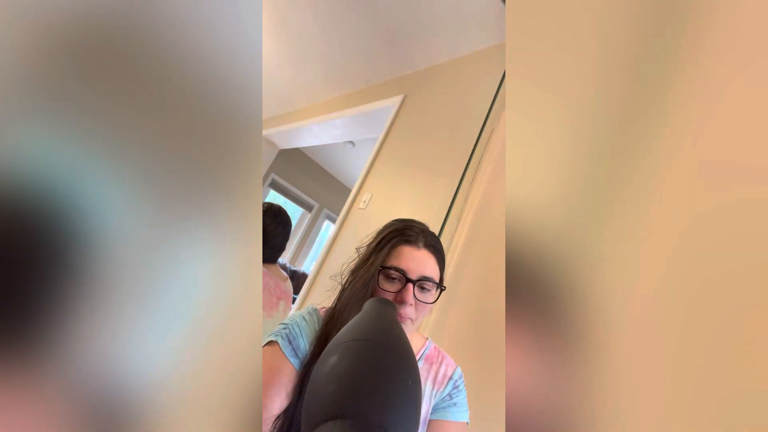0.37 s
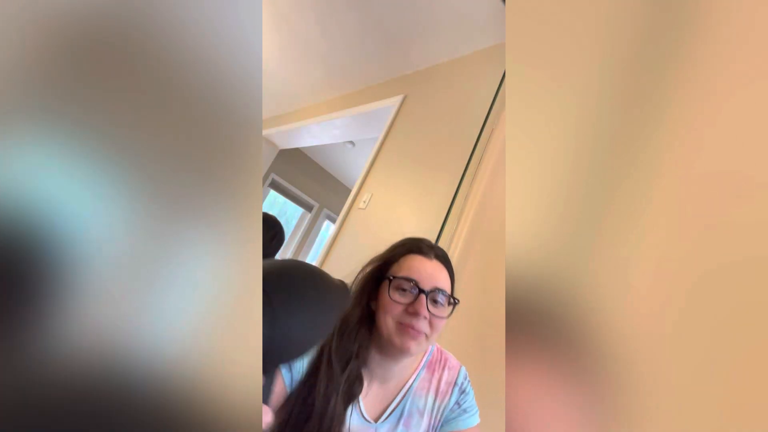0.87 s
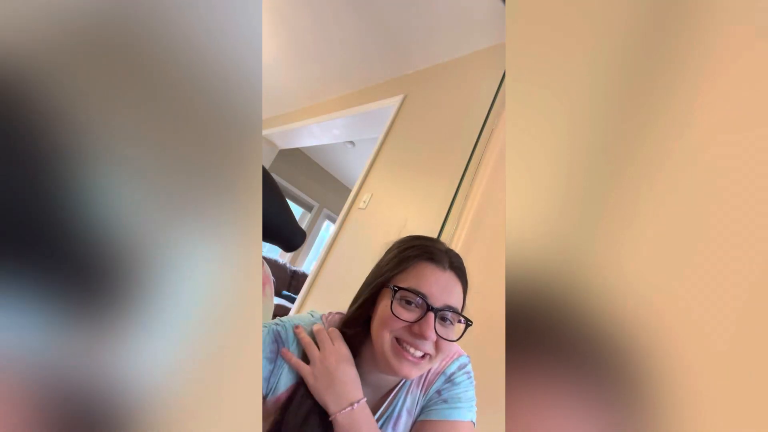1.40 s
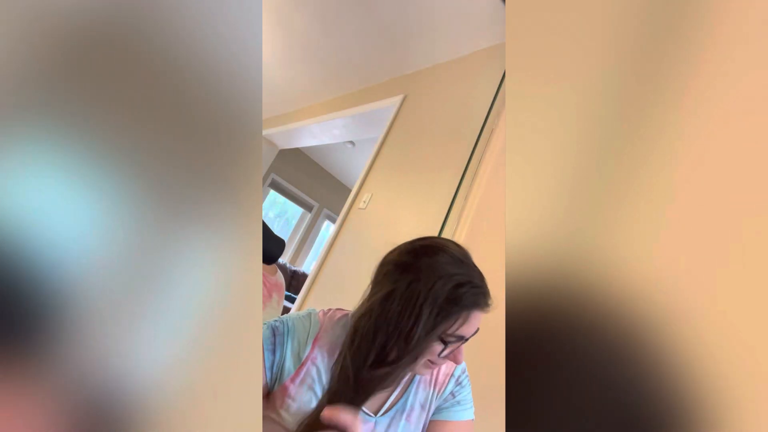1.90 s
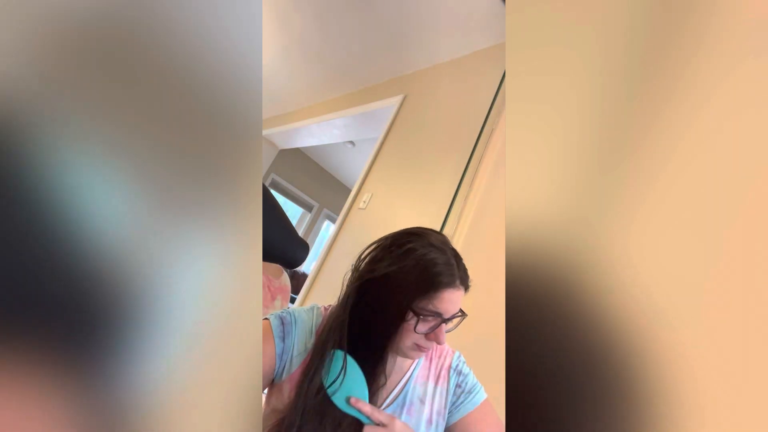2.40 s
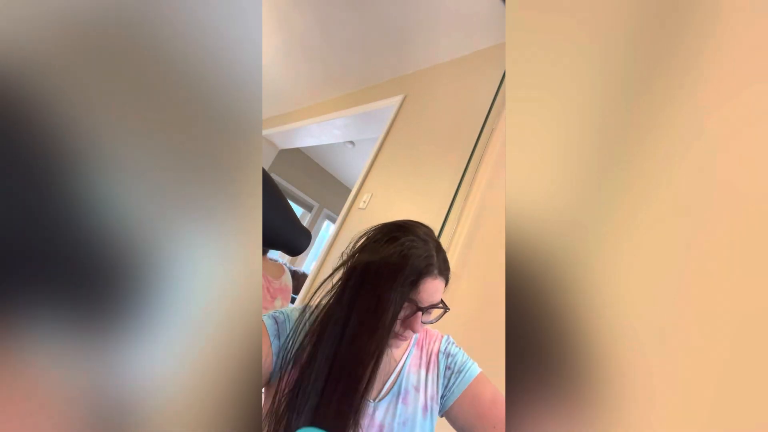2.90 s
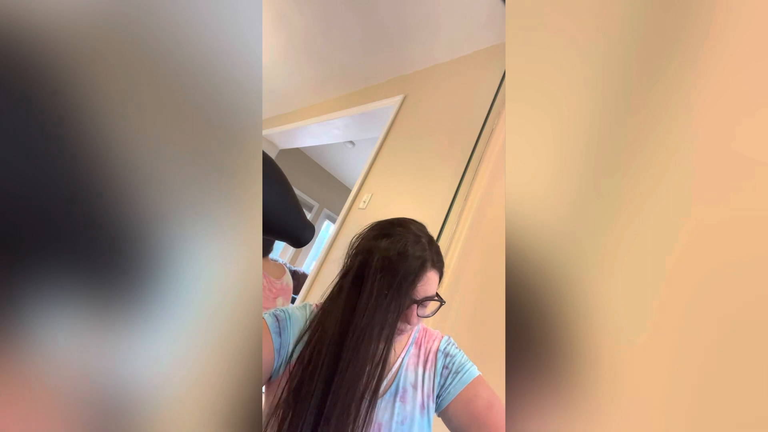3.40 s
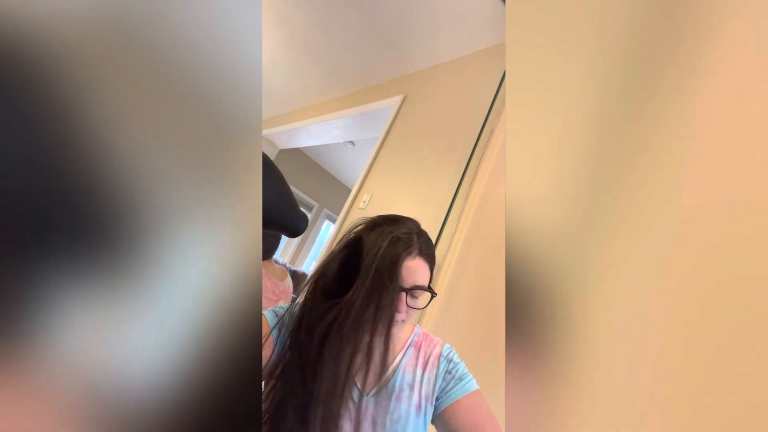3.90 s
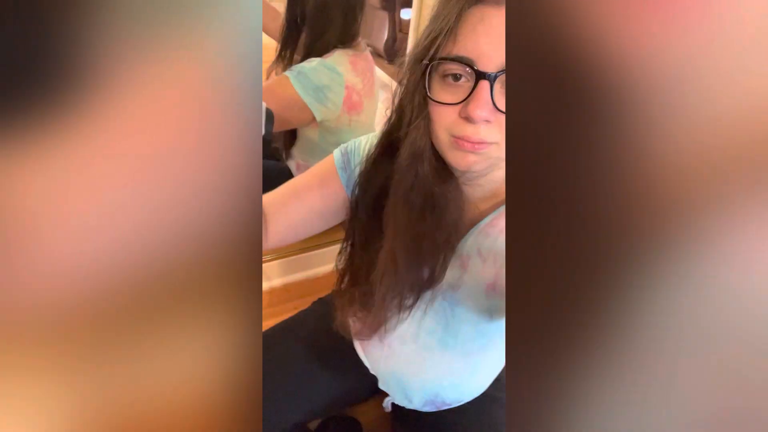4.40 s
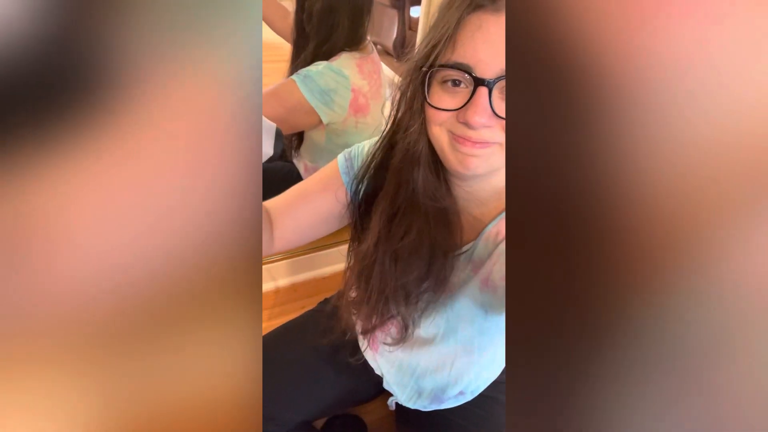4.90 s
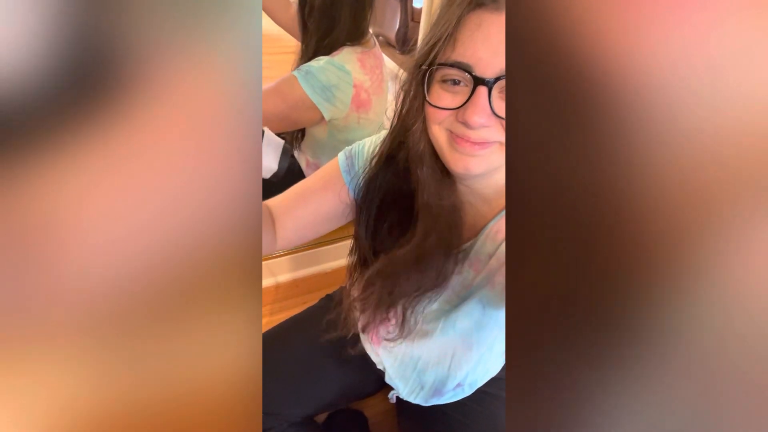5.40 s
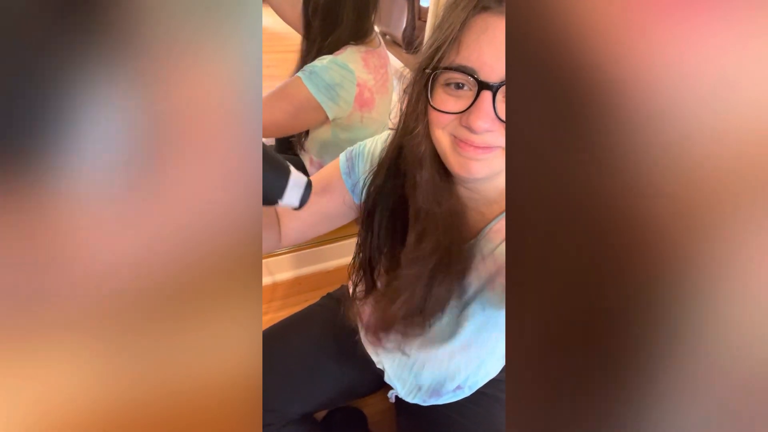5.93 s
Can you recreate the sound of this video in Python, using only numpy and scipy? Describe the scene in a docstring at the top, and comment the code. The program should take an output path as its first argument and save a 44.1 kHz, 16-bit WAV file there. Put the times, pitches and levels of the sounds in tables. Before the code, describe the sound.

Switch clicks in a quiet room, then a hair dryer's rush swells to a loud, hissy roar and keeps blowing, its tone shifting at two cuts.

```python
"""Hair dryer in a small room

A handheld hair dryer is switched on close to a phone's two microphone ports, spins up and blows steadily.
Shaped noise, its level set by fan speed, rings the barrel's resonances over a faint shaft sine; switch
detents rattle a ringing housing, brushes whirr thinly and the quiet room lies beneath. Three shots are
joined by hard cuts, the later two fading in quickly, with the dryer held a little differently in each."""
import sys
import numpy as np
from scipy import signal
from scipy.fft import rfft, irfft
from scipy.io import wavfile
from scipy.ndimage import uniform_filter1d

SR = 44100
rng = np.random.default_rng(int(sys.argv[2]) if len(sys.argv) > 2 else 0)


def level_to_linear(level):
    """Convert decibel levels to linear amplitude factors, elementwise."""
    exponent = np.asarray(level, float) / 20
    return 10 ** exponent


def waveform_to_disk(signal):
    """Save audio, clipped to [-1, 1], as 16-bit WAV at the path in sys.argv[1]."""
    frames = np.transpose(np.atleast_2d(signal))
    scaled = np.clip(frames, -1, 1) * 32767
    samples = np.round(scaled).astype(np.int16)
    wavfile.write(sys.argv[1], SR, samples)


N = 266584
SIZE, HOP = 2048, 512  # short-time frames (samples)
FRAME_S = np.arange(N // HOP + 6) * HOP / SR
BIN_HZ = np.fft.rfftfreq(SIZE, 1 / SR)
BIN_COLUMN_HZ = BIN_HZ[:, None]


def evened(x):
    """Scales to rms 1."""
    return x / np.sqrt(np.mean(x ** 2) + 1e-20)


def read(hz_points, values, hz):
    """Joins points on a log frequency axis."""
    return np.interp(np.log(hz + 1), np.log(np.asarray(hz_points) + 1), values)


def noise(magnitude):
    """Two unrelated noises with one short-time magnitude (bins x frames): direct path and room path."""
    real, imaginary = rng.standard_normal((len(FRAME_S), len(BIN_HZ), 2, 2)).T
    return signal.istft((real + 1j * imaginary) * magnitude, nperseg=SIZE, noverlap=SIZE - HOP)[1][:, :N]


def resonance(hz, width_hz, db, steepness):
    """Power of one resonance over bins and frames, falling away on both sides of its peak."""
    return level_to_linear(db) ** 2 / (1 + (2 * (BIN_COLUMN_HZ - hz) / width_hz) ** 2) ** steepness


# where one shot is cut to the next: cut_s
CUT_TIMES = [1.9772, 4.2938]


def by_shot(table, t):
    """The columns of a one-row-a-shot table at times t."""
    return np.array(table)[np.searchsorted(CUT_TIMES, t)].T


def speed(t):
    """Share of full shaft speed: an exponential approach once the second detent powers the motor."""
    spin_up_s = 0.42
    return 0.00083 + 1 - np.exp(-np.maximum(t - DETENTS[1][0], 0) / spin_up_s)


# broad turbulence under the resonances, relative levels: pitch_hz, level_db (per Hz)
TURBULENCE = [(30, -48), (85, -18), (170, -23.5), (330, -14.5), (620, -13.5), (900, -12), (1600, -16.5),
              (2250, -13.5), (2450, -16), (2700, -10), (4500, -15), (4950, -17), (5500, -12), (7500, -10.5),
              (10000, -17), (11500, -21), (13500, -25.5), (15000, -24), (16000, -29)]
# roar, rush and hiss, the bands whose power is levelled: low_hz, high_hz
AIR_BANDS = [(150, 2400), (2500, 4200), (4200, 11000)]
# one row a shot, relative, at full speed: roar_db, rush_db (above the roar), hiss_db (above the roar), hum_db
SHOT_LEVELS = [(-26, -5, -1.1, -51.5), (-26, -5.5, -0.44, -48.5), (-26, -5, -2.1, -44.5)]
# how the dryer is held: time_s, nearness (0 at the hair, 1 beside the phone), aim (0 side-on, 1 at the phone)
HAND = [(.44, 0.88, .05), (.58, 1.26, 0.63), (.68, 1.14, 1.05), (.78, 1.06, 0.95), (1.05, 0.73, 0.71),
        (1.3, 0.26, 0.13), (1.7, 0.06, 0.026), (3.82, 0.015, 0.012), (4.0, .02, 0.42), (4.28, .05, 0.68),
        (4.3, 0.036, .02), (5.15, 0.022, 0.088), (5.4, 0.0089, 0.15), (6.04, 0.3, 0.1)]
ROAR_LAW, RUSH_LAW, HISS_LAW = 3.1, 3.5, 4.5  # amplitude grows as speed to this power


def air():
    """Turbulence through the barrel: noise whose roar, rush and hiss follow fan speed and aim."""
    s, nearness, facing = np.transpose(HAND)
    near, aim = (np.clip(np.interp(FRAME_S, s, column), 0, 1.2) for column in (nearness, facing))
    power = level_to_linear(read(*np.transpose(TURBULENCE), BIN_HZ))[:, None] ** 2
    power = power + barrel_rings(near, aim) + hair_gap()
    # close to the phone the housing shades the top treble, and the room's bass does not grow
    power *= level_to_linear(2 * -1 * near / (1 + (7800 / (BIN_COLUMN_HZ + 1)) ** 8))
    power *= level_to_linear(2 * -6.5 * near / (1 + (BIN_COLUMN_HZ / 390) ** 8))
    power *= 1 / (1 + (48 / (BIN_COLUMN_HZ + 1)) ** 8)  # the microphone drops the deepest bass

    # level the three bands against each other, with crossovers 400 Hz wide
    roar, rush, hiss = (power[(BIN_HZ > low) & (BIN_HZ < high)].sum(0) for low, high in AIR_BANDS)
    _, rush_db, hiss_db, _ = by_shot(SHOT_LEVELS, FRAME_S)
    rush_lift = level_to_linear(rush_db) * speed(FRAME_S) ** (RUSH_LAW - ROAR_LAW)
    aimed_hiss_db = 7  # extra hiss with the nozzle at the phone
    hiss_lift = level_to_linear(hiss_db + aimed_hiss_db * aim) * speed(FRAME_S) ** (HISS_LAW - ROAR_LAW)
    above_roar = np.clip((BIN_COLUMN_HZ - 2300) / 400, 0, 1)
    above_rush = np.clip((BIN_COLUMN_HZ - 4000) / 400, 0, 1)
    gain = (rush_lift / np.sqrt(rush)) ** (above_roar - above_rush)
    gain *= (hiss_lift / np.sqrt(hiss)) ** above_rush
    gain /= np.sqrt(roar) ** (1 - above_roar)

    # the highest hiss is the most directional: it swells further when the nozzle turns to the phone
    highest = np.clip((BIN_COLUMN_HZ - 10500) / 1500, 0, 1)
    gain *= np.maximum(hiss_lift, .7) ** (1.3 * highest)
    # near but side-on, a band around 3640 Hz is shaded
    side_on = near * np.maximum(1 - aim, 0)
    gain *= level_to_linear(-8.5 * side_on / (1 + ((BIN_COLUMN_HZ - 3640) / 610) ** 4))

    blow = noise(np.sqrt(power) * gain * level_to_linear(eddies_db())) * level_to_linear(2.0)
    t = np.arange(N) / SR
    near_db = 5  # level added per unit of nearness
    level = level_to_linear(by_shot(SHOT_LEVELS, t)[0] + near_db * np.interp(t, s, nearness)) * speed(t) ** ROAR_LAW
    return blow * level, level / level.max()


# resonances of barrel and grille, warm, relative levels by pose:
# pitch_hz, width_hz, side_on_db, last_shot_side_on_db, aimed_db, beside_phone_db
BARREL = [(433, 104, -3, -7.5, -9, 1), (510, 76, -6, -.5, -10, 0.5), (1060, 26, -8, -9.5, -9, -6),
          (1313, 36.5, -9, 2, -23.5, -8), (1306, 78, -1, -3, -4, -1), (1900, 193, -24, -11.5, -22, -9.5),
          (2035, 60, -3.5, -4, -1, -2.5), (2860, 39, -20, -1, -24, -20), (3026, 30, -0.5, -4, -6, -6),
          (3220, 41, -17, 1, -29, -22), (3440, 120, -12.5, -15, -10, -27), (4000, 120, -22, -6, 0, -22),
          (4510, 187, -11, -11, -15, -2.5), (5380, 170, -12, -16, -26, -3.5),
          (5720, 44, -6.5, -8, -10, -10), (6542, 244, -5, -9, -7, 0), (7200, 55, -9, -15, 3, -7),
          (8300, 200, -10, -11, -9, -13), (8880, 79, -5, -11.5, 2.5, -6.5)]


def barrel_rings(near, aim):
    """Power of the barrel's resonances: flat while its air is cold, blended by pose, wandering with the hand."""
    cold_flat, warm_s = 0.037, 0.55  # share of pitch at the start, time constant of the heater's warming
    drift_db, drift_share = 1.6, .006  # rms swell in level, rms wander in pitch
    tuning = 1 - cold_flat * np.exp(-FRAME_S / warm_s)
    drift = rng.standard_normal((len(BARREL), 2, len(FRAME_S)))
    drift = evened(uniform_filter1d(uniform_filter1d(drift, size=24), size=24))
    power = 0
    for (hz, width_hz, side_db, last_db, aimed_db, near_db), (swell, wander) in zip(BARREL, drift):
        db = np.where(FRAME_S > CUT_TIMES[1], last_db, side_db)
        db = db + aim * (aimed_db - db)
        db += near * (near_db - db) + drift_db * swell
        moved_hz = hz * tuning * (1 + drift_share * wander)
        blurred_hz = width_hz * (1 + 0.4 * near)  # wider beside the phone
        power = power + resonance(moved_hz, blurred_hz, db, 1.27)
    return power


# resonance between dryer and hair, one row a shot, relative level: from_hz, to_hz, width_hz, level_db
GAP_SLIDES = [(694, 820, 120, -7.5), (690, 750, 63, -5.5), (750, 750, 54, -65)]


def hair_gap():
    """Power of the resonance between dryer and hair, sliding in pitch as the gap changes."""
    shots = np.c_[[0, *CUT_TIMES], [*CUT_TIMES, N / SR], GAP_SLIDES]
    start, end, from_hz, to_hz, width_hz, db = by_shot(shots, FRAME_S)
    hz = from_hz + (to_hz - from_hz) * (FRAME_S - start) / (end - start)
    return resonance(hz, width_hz, db, 1.54)


def eddies_db():
    """Eddies as random level: patches a few hundred Hz wide, and a flutter shared by all bands."""
    patchy_db, flutter_db = 1.13, 0.28  # rms
    draws = rng.standard_normal((len(FRAME_S), len(BIN_HZ) + 1)).T
    patches = uniform_filter1d(uniform_filter1d(draws[1:], 15, 0), 6, 1)
    flutter = uniform_filter1d(draws[0], 3)
    return patchy_db * evened(patches) + flutter_db * evened(flutter)


# low room resonances under the roar, at its loudest: pitch_hz, width_hz, level_db
LOW_ROOM = [(86.6, 23, -51.5), (222.4, 25, -49)]


def hum(effort):
    """The unbalanced shaft as a wavering sine, and narrow low resonances fed by the air."""
    full_hz, hum_law = 277.2, 2.6  # pitch at full speed; amplitude grows as speed to this power
    t = np.arange(N) / SR
    waver = evened(uniform_filter1d(uniform_filter1d(rng.standard_normal(N), 4000), 4000))
    shaft_hz = full_hz * speed(t) + 0.875 * waver
    tone = np.sqrt(2) * np.sin(2 * np.pi * np.cumsum(shaft_hz) / SR)
    out = tone * level_to_linear(by_shot(SHOT_LEVELS, t)[3]) * speed(t) ** hum_law
    bins_hz = np.fft.rfftfreq(N, 1 / SR)
    for hz, width_hz, db in LOW_ROOM:
        ring = irfft(rfft(rng.standard_normal(N)) / (1 + (2 * (bins_hz - hz) / width_hz) ** 2), N)
        out += level_to_linear(db) * evened(ring) * effort
    return out


# slider detents: start_s, peak_db (direct sound), rattle_s, crack_db (crack gain beside the ring)
DETENTS = [(.1620, -41, .006, 7.5), (.2073, -24.5, .0065, 5.5), (.2628, -24.5, .008, 6.5)]
# modes of the housing, relative levels: pitch_hz, level_db, t60_s
HOUSING = [(243, -16, 0.08), (483, -16, 0.091), (930, -20, 0.042), (1370, -1, 0.054), (2070, -2, 0.039),
           (3300, 4, 0.011), (6600, 1, 0.004)]


def switch():
    """Each detent's rattle, a short noise burst, cracks and rings the housing; the room answers."""
    rattle_rise_s, room_t60_s, room_db = .003, .2, -6.5
    t = np.arange(SR // 2) / SR
    shell = sum(level_to_linear(db - 60 * t / t60) * np.sin(2 * np.pi * hz * t) for hz, db, t60 in HOUSING)
    shell /= np.linalg.norm(shell)
    crack_filter = signal.butter(1, [1100, 15000], "band", fs=SR)  # thin, little bass
    out = np.zeros((2, N))
    for start_s, db, length_s, crack_db in DETENTS:
        envelope = np.clip(t / rattle_rise_s, 0, 1) ** 1.6 * np.exp(-2 * (t / length_s) ** 2)
        rattle = rng.standard_normal(len(t)) * envelope * (t < 4 * length_s)
        crack = level_to_linear(crack_db) * signal.lfilter(*crack_filter, rattle)
        ring = signal.fftconvolve(rattle, shell)[:len(t)]
        size = level_to_linear(db) / abs(ring + crack).max()
        tail = rng.standard_normal((2, len(t))) * level_to_linear(-60 * t / room_t60_s) * (t > .004)
        tail /= np.linalg.norm(tail[0])
        to_walls = .4 * ring + crack  # only a share of the ring reaches the walls
        wet = signal.fftconvolve(to_walls[None], tail, axes=1)[:, :len(t)]
        click = (ring + crack) * np.array([[1], [.5]]) + level_to_linear(room_db) * wet
        out[:, round(start_s * SR):][:, :len(t)] += size * click
    return out


def brushes():
    """Motor brushes as a thin broad whirr from the moment of power, soon buried under the air."""
    band = signal.butter(2, (400, 7350), "band", fs=SR)
    whirr = evened(signal.lfilter(*band, rng.standard_normal((2, N))))
    powered = np.clip((np.arange(N) / SR - DETENTS[1][0]) / .01, 0, 1)
    return level_to_linear(-55.5) * whirr * powered


# spectrum of the quiet room, relative levels: pitch_hz, level_db (per Hz)
QUIET_ROOM = [(24, -30), (40, -1), (156, -7), (248, -16), (900, -20), (1300, -20), (10000, -29),
              (13000, -67), (22000, -120)]


def room_floor():
    """The quiet room as steady, bass-heavy noise."""
    floor = noise(level_to_linear(read(*np.transpose(QUIET_ROOM), BIN_HZ))[:, None])
    return level_to_linear(-75.5) * evened(floor)


# microphone port pair, side against mid:
# pitch_hz, side_db (first two shots), last_side_db (last shot), tied_share (to mid), side_phase_rad
PORT_PAIR = [(60, -49, -33, .3, 0), (150, -28, -38, .3, 12.5), (393, -21.5, -25.5, 0.46, 0),
             (930, -8.5, -7, 0.33, -0.2), (2010, -5, -11, .4, -1.4), (2630, 0, 2.5, 0.33, 2),
             (3150, -0.5, -1, 0.55, 1), (3800, -19, -3.5, .3, 2), (4430, -5.5, -7, .3, 1.3),
             (5200, -11.5, -4.5, .3, 1.7), (6100, -24, -10, .3, 1.6), (6330, -11.5, -11.5, 0.81, 1.57),
             (8400, -0.5, -1, .8, 1.57), (10160, 0.5, 1, .8, 1.57), (11400, 19, 21, .8, 1.57),
             (12100, 27, 17, .8, 3), (12600, 45, 45, .8, 8)]


def ports(direct, diffuse):
    """Two close ports: the side signal is a phase-turned share of the mid plus unrelated room sound."""
    hz, first_db, last_db, tied, phase = np.transpose(PORT_PAIR)
    _, t, (direct_bins, room_bins) = signal.stft([direct, diffuse], SR, nperseg=SIZE, noverlap=SIZE - HOP)
    first_db, last_db = (read(hz, db, BIN_HZ)[:, None] for db in (first_db, last_db))
    ratio = level_to_linear(np.where(t > CUT_TIMES[1], last_db, first_db))
    tied = np.clip(read(hz, tied, BIN_HZ), 0, 1)[:, None]
    turn = np.exp(1j * read(hz, phase, BIN_HZ))[:, None]
    share = 1 / np.sqrt(1 + ratio ** 2)  # mid and side split the power
    mid = direct_bins * share
    side = (tied * turn * direct_bins + np.sqrt(1 - tied ** 2) * room_bins) * ratio * share
    return signal.istft([mid + side, mid - side], nperseg=SIZE, noverlap=SIZE - HOP)[1][:, :N]


def scene():
    """Dryer, switch and quiet room at the port pair."""
    blow, effort = air()
    direct, diffuse = blow + hum(effort) + switch() + brushes() + room_floor()
    return ports(direct, diffuse)


def low_pass(x):
    """Removes everything above the highest recorded frequency."""
    return signal.sosfilt(signal.butter(12, 15740, fs=SR, output="sos"), x)


def record(dry):
    """After each hard cut the new shot fades in from near silence."""
    fade_s = 0.023
    t = np.arange(N) / SR
    fade = np.ones(N)
    for cut_s in CUT_TIMES:
        fade *= np.where(t >= cut_s, np.clip(0.026 + (t - cut_s) / fade_s, 0, 1), 1)
    return low_pass(dry * fade)


dry = scene()
out = record(dry)
waveform_to_disk(out)
```